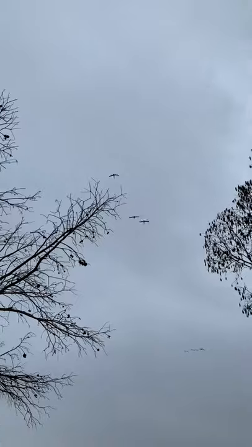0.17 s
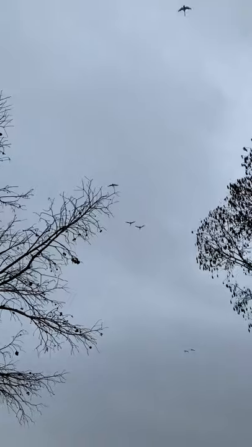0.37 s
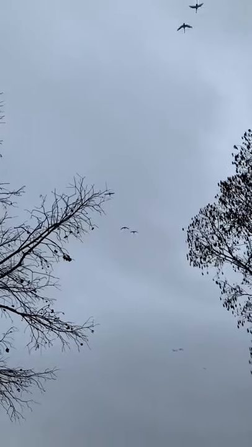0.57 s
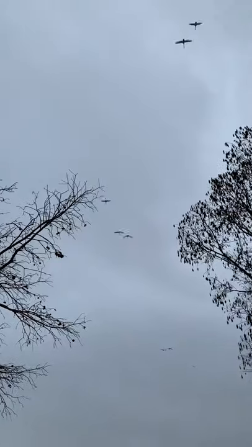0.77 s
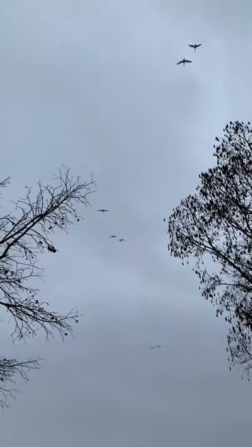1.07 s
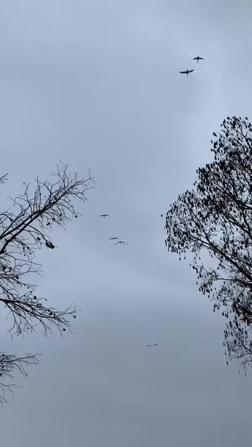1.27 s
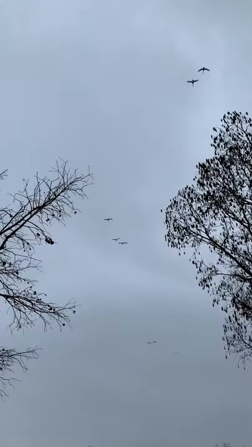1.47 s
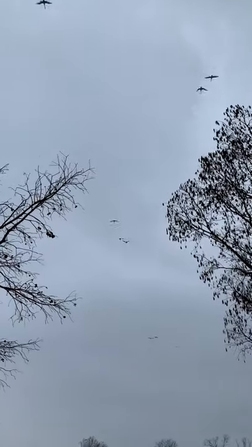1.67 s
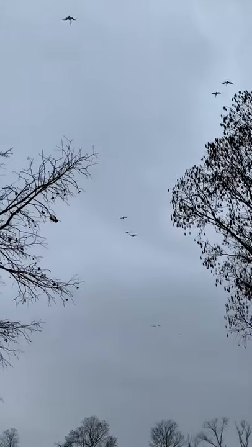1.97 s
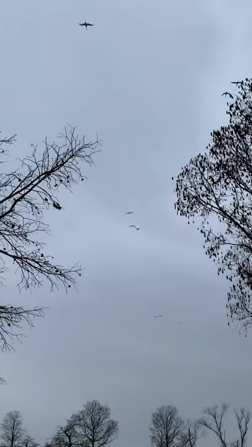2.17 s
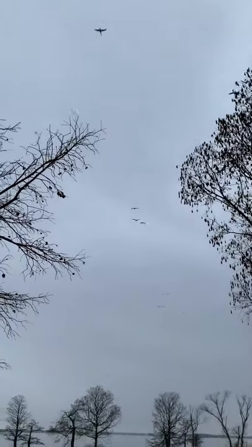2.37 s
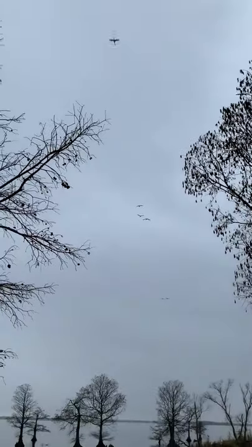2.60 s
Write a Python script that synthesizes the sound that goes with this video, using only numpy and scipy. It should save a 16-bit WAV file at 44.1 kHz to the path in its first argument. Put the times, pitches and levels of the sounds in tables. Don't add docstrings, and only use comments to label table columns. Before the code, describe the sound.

After a tiny clipped scrap and near silence, sound starts abruptly at 0.08 s: a large swan flock honking continuously, far calls blurred over water, with many short mid-pitched honks. Brighter overhead honks come at 0.87 and 2.05, a long clear one at 1.57, hoarse and sharp breaking ones at 2.5-2.7. Faint high bird chips at 0.16, 1.18 and 2.07. Low wind rumble gusts, strongest early; faint hiss.

```python
import sys
import numpy as np
from scipy import signal
from scipy.fft import rfft, irfft
from scipy.io import wavfile
from scipy.ndimage import uniform_filter1d

SR = 44100
rng = np.random.default_rng(int(sys.argv[2]) if len(sys.argv) > 2 else 0)


def master_out(mix):
    frames = np.transpose(np.atleast_2d(mix))
    ceiling = np.clip(frames, -1, 1)
    pcm = np.round(ceiling * 32767).astype(np.int16)
    wavfile.write(sys.argv[1], SR, pcm)


def how_loud(loudness_db):
    steps = np.asarray(loudness_db, float) / 20
    return 10 ** steps


N = 120834
T = np.arange(N) / SR
HZ = np.arange(N // 2 + 1) * SR / N


def level(x, db):
    return x * how_loud(db) / np.sqrt(np.mean(x ** 2))


def curve(table, col, at):
    return np.interp(at, np.array(table)[:, 0], np.array(table)[:, col])


def colour(table, hz):
    return how_loud(np.interp(np.log(hz + 1), np.log(np.array(table)[:, 0]), np.array(table)[:, 1]))


def walk(rate, size=N):
    k = int(SR / rate)
    steps = np.repeat(rng.standard_normal(N // 300 + 2), k)[:size]
    return 2.11 * uniform_filter1d(uniform_filter1d(steps, k), k)


def noise(table):
    inside = (HZ > table[0][0]) & (HZ < table[-1][0])
    return level(irfft(rfft(rng.standard_normal(N)) * colour(table, HZ) * inside, N), 0)


def echoes(x, t60):
    t = T[:SR // 2]
    tail = rng.standard_normal(len(t)) * np.exp(-np.log(1000) * t / t60)
    return signal.fftconvolve(x, tail / np.sqrt(np.sum(tail ** 2)))[:N]


def add(out, x, start):
    i = max(int(start * SR), 0)
    out[i:i + len(x)] += x[:max(N - i, 0)]


# (frequency [Hz], gain [dB])
THROAT_RESPONSE = [(500, 1.5), (800, 4.5), (1100, -1), (1500, -12), (2400, -11.5), (3500, -17.5),
                   (6000, -39.5), (11000, -74.5)]


def honks(table, tilt_db, voice=(0, 0, 0, 0), count=14, steady=False, swell=False):
    attack_s, release_s = .012, .02
    scoop, scoop_s, sag, sag_s = .025, .008, .015, .012
    waver, flutter_db, partial_db, shimmer_db, shimmer_s = .004, 1.5, 1, 1.4, .005
    out = np.zeros(N)
    k = np.arange(1, count + 1)[:, None]
    voice_db = np.pad(voice, (0, count - len(voice)))[:, None]
    for start, length, first, last, db in table:
        t = T[:int((length + release_s) * SR)]
        hz = np.interp(t, [0, length], [first, last]) * (1 + waver * walk(63.4, size=len(t)))
        sagging = sag * np.exp(np.minimum(t - length, release_s) / sag_s - 1)
        hz = hz * (1 - scoop * np.exp(-t / scoop_s) - sagging)
        chance = rng.standard_normal((count, 2))
        partial_gain_db = tilt_db * np.log2(k) + partial_db * chance[:, :1] * (k > 1) + voice_db
        gain = colour(THROAT_RESPONSE, k * (first + last) / 2) * how_loud(partial_gain_db)
        step = int(shimmer_s * SR)
        air = np.repeat(rng.standard_normal((count, 70)), step, axis=1)[:, :len(t)]
        air = uniform_filter1d(air, step, axis=1)
        gain = gain * how_loud(shimmer_db * np.sqrt(k - 1) * air)
        phase = k * 2 * np.pi * np.cumsum(hz) / SR + 9 * chance[:, 1:]
        tone = np.sum(gain * np.sin(phase), axis=0)
        shape = np.clip(np.minimum(t / attack_s, (length + release_s - t) / (2 * release_s)), 0, 1)
        if swell:
            shape = shape * np.sin(np.pi * (t / t[-1]) ** .75)
        flutter = flutter_db * (1 - steady) * walk(45, size=len(t))
        add(out, 1.124 * tone * shape * how_loud(db + flutter), start)
    return out


# (time [s], level [dB], level of blurred overtones [dB])
FLOCK_CALLING = [(.1, -57, 4), (.25, -54, 2), (.45, -46.5, 6), (.7, -52.5, 4.5), (.82, -52, 1),
                 (1.05, -55, 1), (1.25, -52, 3.5), (1.45, -45.5, -3), (1.65, -46, 7.5), (1.85, -49.5, 5),
                 (2.05, -53, 6), (2.25, -49.5, 1.5), (2.45, -50, 2), (2.74, -43.5, 4.5)]


def flock(count=110):
    low_hz, high_hz, spread_db, t60_s, wet_db = 606.7, 1058, 4.5, 1, 1.5
    u = rng.random((count, 5)).T
    hz = low_hz + (high_hz - low_hz) * (u[1] + u[4]) / 2
    start = (np.arange(count) + u[0]) / count * (T[-1] + .2) - .2
    length, last_hz = .05 + .12 * u[2], hz * (1.03 - 0.092 * u[3])
    rows = np.array([start, length, hz, last_hz, spread_db * 2 * u[4]]).T
    calls = honks(rows, -3.5, count=7)
    blurred = calls + how_loud(wet_db) * echoes(calls, t60_s)
    return level(blurred, 0) * how_loud(curve(FLOCK_CALLING, 1, T))


# (frequency [Hz], density [dB per Hz])
HAZE_SPECTRUM = [(260, -34.5), (500, -24.5), (620, -5), (800, 5), (1050, -13), (1250, -32.5), (1600, -35.5)]
# (frequency [Hz], density [dB per Hz])
OVERTONE_SPECTRUM = [(1000, -17.5), (1400, -1), (2000, -7), (3500, -11), (4500, -20), (6000, -38),
                     (8000, -49)]


def haze():
    low = noise(HAZE_SPECTRUM) * how_loud(-47 + 1.5 * walk(6.65))
    overtones = noise(OVERTONE_SPECTRUM)
    return low + overtones * how_loud(-60.5 + curve(FLOCK_CALLING, 2, T) + .8 * walk(14))


def hiss():
    return noise([(1000, -44.0), (3000, -10.0), (17000, -21.34)]) * how_loud(-82)


# (time [s], length [s], first pitch [Hz], last pitch [Hz], level [dB])
STRAY_HONKS = [
    (.06, 0.065, 717.8, 684.2, -50),
    (1.2, 0.084, 702.4, 660, -55),
    (2.47, 0.12, 607, 718, -60.5),
]
STRAY_PARTIALS = [0, 9, -2, -2]


def stray_honks():
    return honks(STRAY_HONKS, 0, STRAY_PARTIALS)


# (time [s], level [dB], whistle of higher eddies [dB])
GUSTS = [(0.09, -46, -23), (0.24, -58.5, -16), (0.29, -56, -10), (0.65, -60.5, -7.5), (0.7, -47, -21.5),
         (0.74, -62, -10), (0.9, -60.5, -9.5), (1.18, -64, -5), (1.34, -59, -9), (1.46, -65, -8),
         (1.83, -54, -6), (2.42, -60, -1), (2.47, -50.5, -14), (2.53, -63, 5), (2.56, -53, -19),
         (2.74, -57.5, -3)]
# (frequency [Hz], density [dB per Hz])
BUFFET_SPECTRUM = [(20, -28), (35, -9), (60, -4), (100, -2), (140, -11.5), (260, -40)]
# (frequency [Hz], density [dB per Hz])
EDDY_SPECTRUM = [(100, -31.5), (150, 0.5), (220, 0.5), (300, -8), (450, -13), (600, -21.5)]


def wind():
    alike, gust_db, steady_s = 0.5, 2.03, 0.11

    def pair(table):
        common = noise(table)
        separate = np.array([noise(table), noise(table)])
        x = np.sqrt(alike) * common + np.sqrt(1 - alike) * separate
        return x / np.sqrt(uniform_filter1d(np.mean(x, axis=0) ** 2, int(steady_s * SR)))

    gust = curve(GUSTS, 1, T)
    buffeting = how_loud(gust + gust_db * walk(9)) * pair(BUFFET_SPECTRUM)
    eddy_db = gust + curve(GUSTS, 2, T) + gust_db * walk(14)
    return buffeting + how_loud(eddy_db) * pair(EDDY_SPECTRUM)


# (time [s], length [s], first pitch [Hz], last pitch [Hz], level [dB])
PASSING_HONKS = [(.105, .09, 802, 781, -45.5), (.12, 0.045, 940, 884, -52.5), (.14, 0.065, 645, 694, -60),
                 (.22, 0.036, 759, 751, -44.5), (.285, .03, 745, 713, -43), (.34, .08, 916, 827, -49),
                 (.37, 0.16, 679, 591, -51), (.38, .05, 831, 800, -47), (.46, .13, 1025, 986, -51.5),
                 (.5, .12, 950, 894, -50), (.5, 0.054, 791, 780, -49), (.59, 0.065, 754, 777, -51),
                 (.63, 0.043, 890, 920, -46), (.65, .035, 837, 845, -43), (.71, 0.12, 859.4, 813, -52),
                 (.73, 0.059, 985, 1086, -56), (.8, 0.085, 633.5, 675, -52), (.82, 0.071, 863, 865, -47.5),
                 (.92, 0.044, 1113, 1080, -49), (1.0, 0.037, 740, 625, -52), (1.0, .06, 810, 852, -55),
                 (1.03, 0.03, 932, 895, -47.5), (1.07, 0.06, 837, 801, -50),
                 (1.13, 0.092, 778.7, 768, -46.5), (1.11, 0.085, 1090, 1077, -54.5),
                 (1.15, 0.048, 873, 895, -54.5), (1.21, .04, 962, 921, -52.5), (1.21, .05, 817, 822, -48),
                 (1.22, .1, 887, 852, -52.5), (1.3, 0.028, 928, 898, -55), (1.29, 0.087, 708, 656.6, -50.5),
                 (1.34, .07, 763.2, 697, -48.5)]
# (time [s], length [s], first pitch [Hz], last pitch [Hz], level [dB])
TRAILING_HONKS = [(1.4, 0.085, 628, 598, -54), (1.38, 0.22, 861, 869.4, -56.5),
                  (1.45, 0.14, 1004, 1051, -50), (1.5, 0.083, 863.6, 951, -43),
                  (1.57, 0.22, 1030, 948, -48.5), (1.6, 0.16, 920, 887, -57), (1.52, .04, 638, 645, -48),
                  (1.77, 0.059, 671, 618.6, -50), (1.66, .05, 725, 764, -47), (1.74, .04, 726, 753, -46.5),
                  (1.78, 0.1, 928, 858, -55.5), (1.87, 0.04, 704, 715, -48.5), (1.9, 0.063, 743, 824, -47),
                  (1.97, 0.059, 791, 757, -49.5), (2.02, .06, 937, 872, -55.5),
                  (2.02, 0.042, 650, 707, -47.5), (2.12, 0.033, 754.6, 780, -45.5),
                  (2.17, 0.05, 1110, 1090, -51), (2.2, 0.025, 804, 911, -47),
                  (2.25, 0.081, 922, 866, -47.5), (2.27, 0.067, 794.6, 786, -48),
                  (2.34, 0.046, 874, 903, -50), (2.37, .05, 816, 780, -47.5), (2.35, 0.14, 990, 1022, -52),
                  (2.49, 0.14, 920, 942, -51), (2.56, 0.048, 747.5, 762, -50),
                  (2.66, 0.052, 803, 787, -45.5), (2.69, 0.051, 751, 773, -44.5),
                  (2.69, 0.069, 723.6, 699, -46.5)]


def passing_honks():
    return honks(PASSING_HONKS + TRAILING_HONKS, -4, count=8)


# (time [s], level [dB], top pitch [Hz])
BIRD_CHIPS = [
    (.163, -58, 6290),
    (1.179, -64.5, 6030),
    (2.073, -63, 6130),
]


def chips():
    length_s, rise_s, fall = .042, .0025, .27
    out, t = np.zeros(N), T[:int(length_s * SR)]
    for start, db, top_hz in BIRD_CHIPS:
        hz = top_hz * (1 - 0.48 * np.exp(-t / rise_s) - fall * (t / length_s) ** 1.6)
        phase = 2 * np.pi * np.cumsum(hz) / SR
        tone = np.sin(phase) + how_loud(-7.5) * np.sin(1.09 * phase)
        add(out, tone * np.sin(np.pi * (t / length_s) ** 0.73) * how_loud(db), start)
    return out + how_loud(-3) * echoes(out, .3)


# (time [s], length [s], first pitch [Hz], last pitch [Hz], level [dB])
OVERHEAD_HONKS = [
    (.26, 0.16, 722.4, 716, -56),
    (.29, 0.083, 766.6, 795, -53.5),
    (.868, .12, 807, 761, -45),
    (1.25, .15, 779, 752.3, -51),
    (2.045, 0.12, 790, 795, -45),
]
OVERHEAD_PARTIALS = [0, 5, 7, 5]


def overhead_honks():
    return honks(OVERHEAD_HONKS, -0.47, OVERHEAD_PARTIALS)


# (time [s], length [s], first pitch [Hz], last pitch [Hz], level [dB])
FACING_HONKS = [
    (.385, 0.035, 765, 718, -58.5),
    (.545, .1, 798, 748, -58),
    (1.89, .17, 759, 765.8, -53.5),
]
FACING_PARTIALS = [0, -6, -9, -6, -9, -5, -1, 2, 2]


def facing_honks():
    return honks(FACING_HONKS, 7, FACING_PARTIALS, swell=True)


def facing_echo(direct):
    return how_loud(-3) * echoes(direct, .12)


# (time [s], length [s], first pitch [Hz], last pitch [Hz], level [dB])
HELD_HONK = [
    (1.565, 0.21, 678.7, 677, -40),
]
HELD_PARTIALS = [0, -6, -2, 3, -4]


def held_honk():
    return honks(HELD_HONK, -2, HELD_PARTIALS, steady=True)


def rasp():
    start_s, length_s, centre_hz, width_hz = 2.525, .085, 3050, 800
    band = [(centre_hz - width_hz, -20), (centre_hz, 0), (centre_hz + width_hz, -15), (8000, -40)]
    shape = np.clip(np.minimum((T - start_s) / .012, (start_s + length_s - T) / .02), 0, 1)
    return noise(band) * shape * how_loud(-51 + 1.7 * walk(120))


# (time [s], length [s], first pitch [Hz], last pitch [Hz], level [dB])
HOARSE_HONK = [
    (2.53, .08, 805.4, 850, -53.5),
]
HOARSE_PARTIALS = [0, 8, 15, 13, 5, 0, -6]


def hoarse_honk():
    return honks(HOARSE_HONK, 0, HOARSE_PARTIALS)


# (time [s], length [s], first pitch [Hz], last pitch [Hz], level [dB])
SHARP_HONK = [
    (2.603, .052, 957, 952, -45),
    (2.648, .03, 945, 870, -49),
]
SHARP_PARTIALS = [0, 13, 16, 9, 6, 9, 12, 12]


def sharp_honk():
    return honks(SHARP_HONK, .5, SHARP_PARTIALS)


# (frequency [Hz], phase of right against left [rad], share of sound that is alike [0-1])
PORT_PAIR = [(400, .4, .6), (1200, .4, .72), (1800, -.6, .4), (2150, -1.4, .2), (2330, -4, .5),
             (2520, -4.5, .6), (2750, -2.9, .7), (3600, -1.8, .8), (4650, -3.14, .97)]


def ports(x, blur):
    lag_s, shore_t60_s = 1 / 4300, 0.28
    turn = curve(PORT_PAIR, 1, HZ) - 2 * np.pi * lag_s * np.maximum(HZ - PORT_PAIR[-1][0], 0)
    alike = np.clip(curve(PORT_PAIR, 2, HZ), 0, 1) ** blur
    sides = []
    for side in (-1, 1):
        direct = np.sqrt(alike) * rfft(x) * np.exp(.5j * side * turn)
        diffuse = np.sqrt(1 - alike) * rfft(echoes(x, shore_t60_s))
        sides.append(irfft(direct + diffuse, N))
    return np.array(sides)


def scene():
    air = hiss()
    distance = haze()
    facing = facing_honks()
    near = overhead_honks() + facing + facing_echo(facing) + stray_honks() + held_honk()
    near = near + sharp_honk() + hoarse_honk() + passing_honks()
    far = flock() + rasp() + chips() + distance + air
    return ports(near, .25) + ports(far, 0.77) + wind()


def low_pass(x):
    return signal.sosfilt(signal.butter(12, 15750, fs=SR, output="sos"), x)


def record(dry):
    start_s, stutter_len_s, fade_s, switch_on_s = .0841, .0116, .003, .00004
    i, lead, size = int(start_s * SR), 1024, int(stutter_len_s * SR)
    out = dry * np.clip((T - T[i]) / switch_on_s, 0, 1)
    fade = np.clip((stutter_len_s - T[:size]) / fade_s, 0, 1)
    out[:, i - lead:i - lead + size] = out[:, i:i + size] * fade
    return low_pass(out)


dry = scene()
out = record(dry)
master_out(out)
```